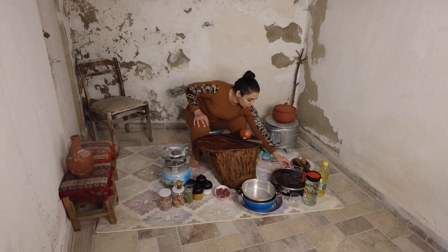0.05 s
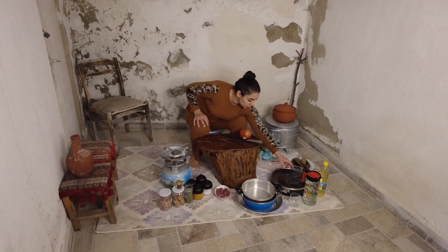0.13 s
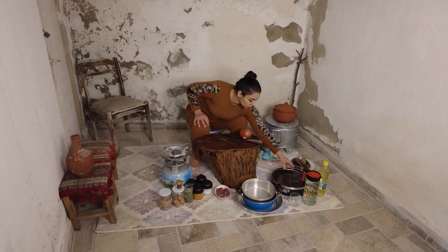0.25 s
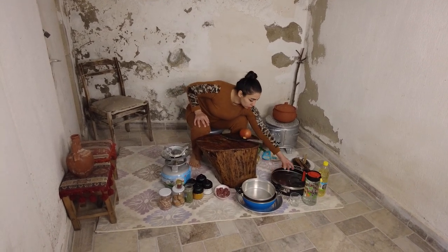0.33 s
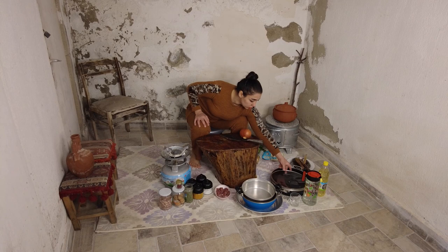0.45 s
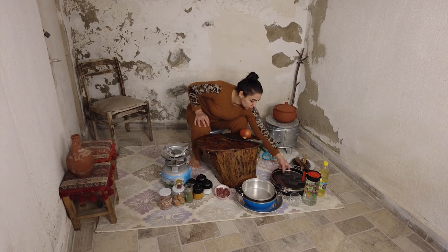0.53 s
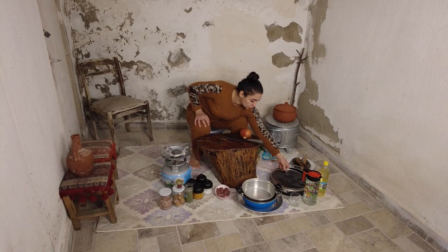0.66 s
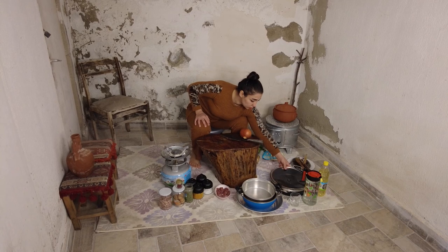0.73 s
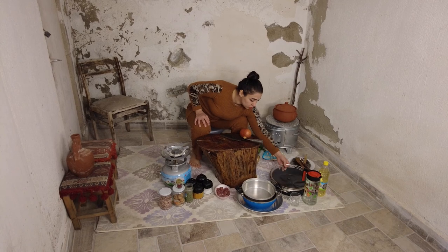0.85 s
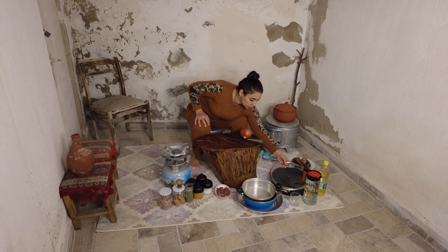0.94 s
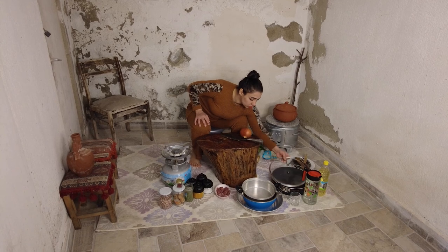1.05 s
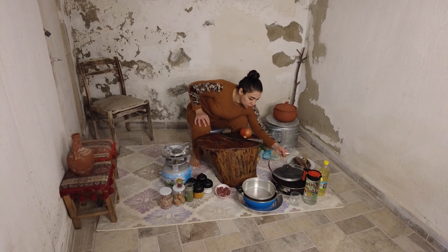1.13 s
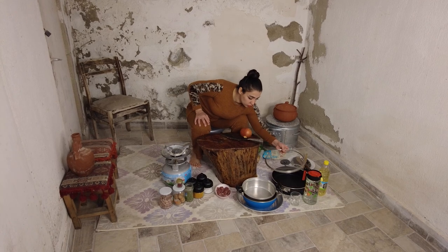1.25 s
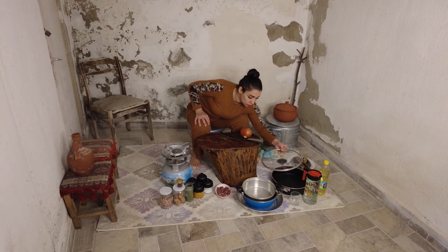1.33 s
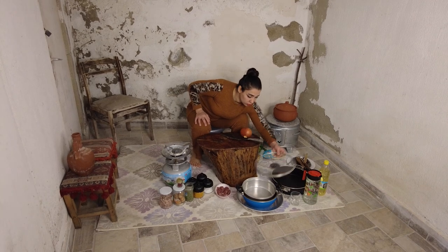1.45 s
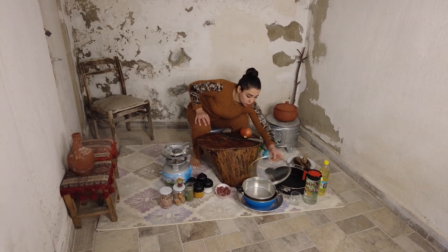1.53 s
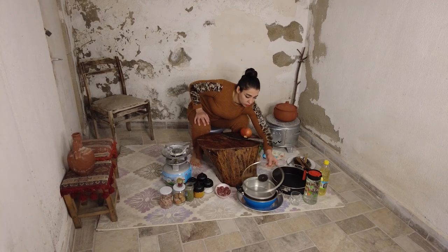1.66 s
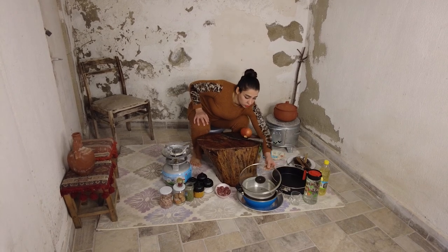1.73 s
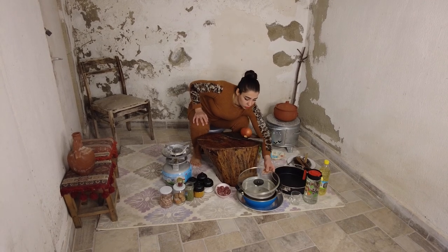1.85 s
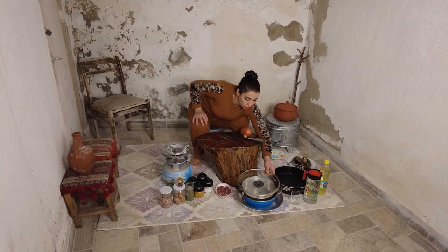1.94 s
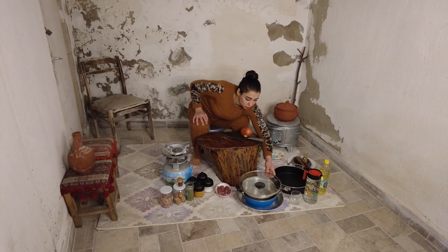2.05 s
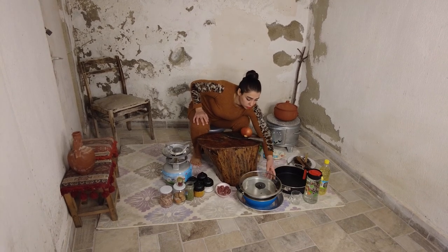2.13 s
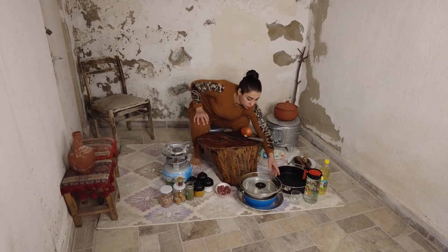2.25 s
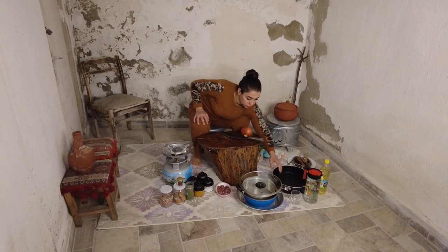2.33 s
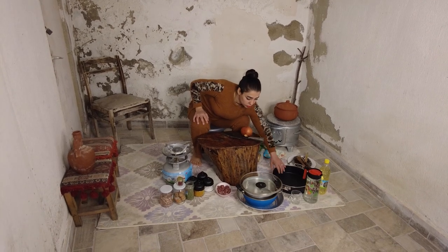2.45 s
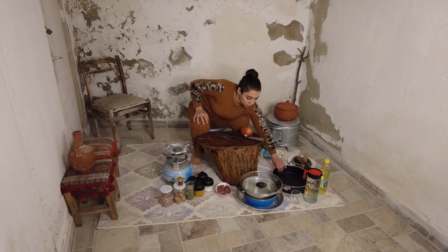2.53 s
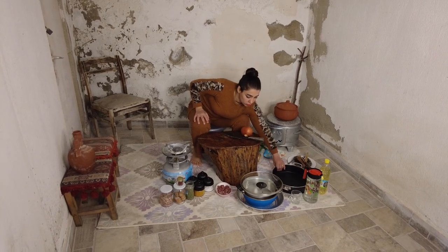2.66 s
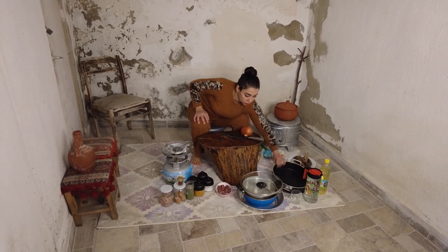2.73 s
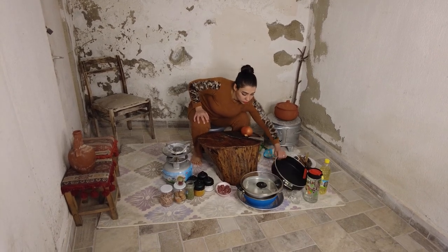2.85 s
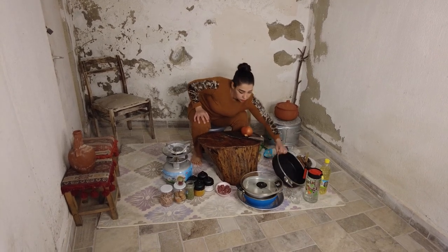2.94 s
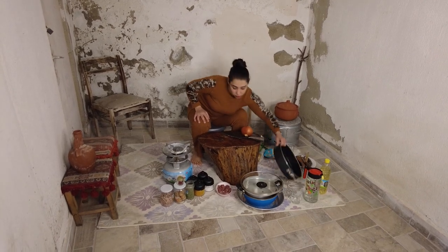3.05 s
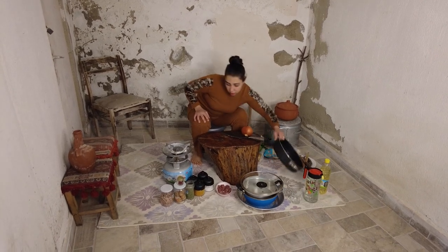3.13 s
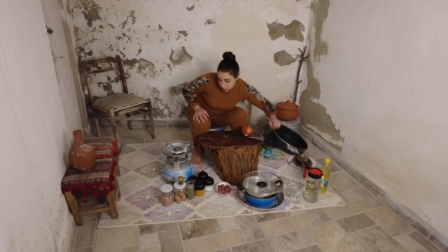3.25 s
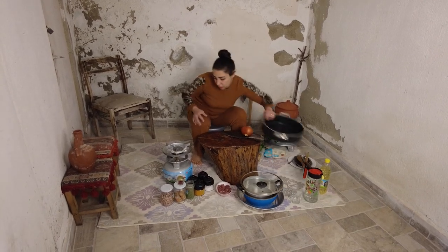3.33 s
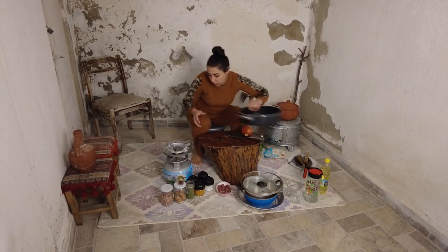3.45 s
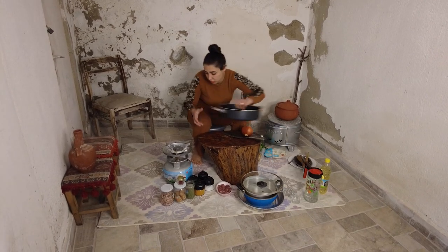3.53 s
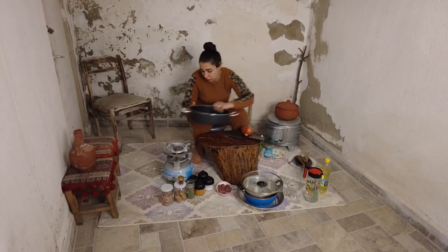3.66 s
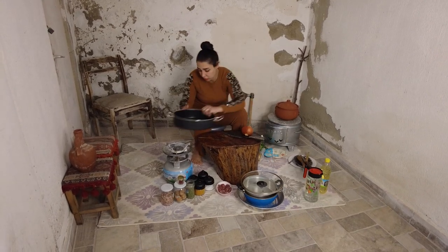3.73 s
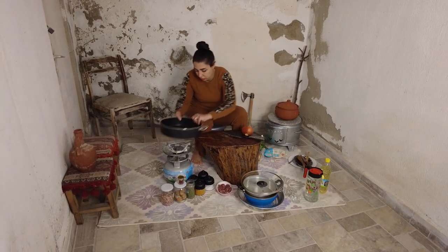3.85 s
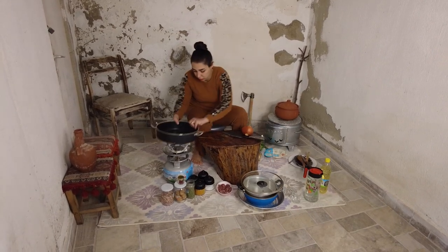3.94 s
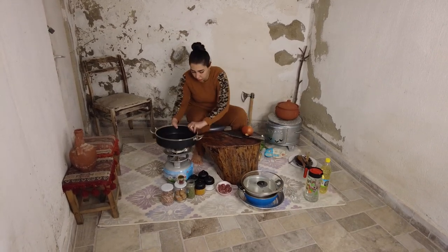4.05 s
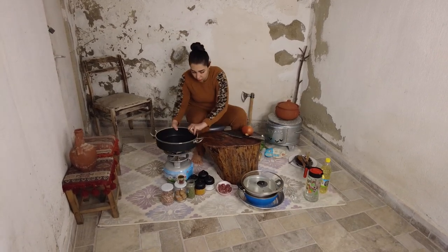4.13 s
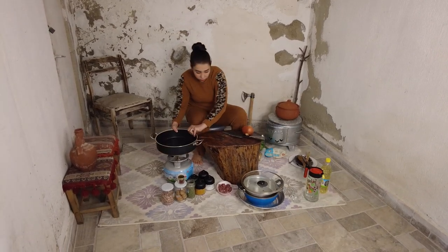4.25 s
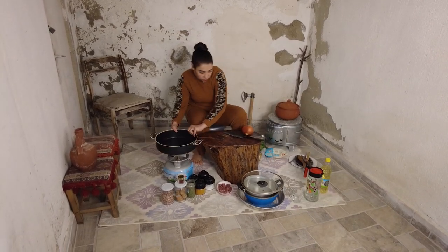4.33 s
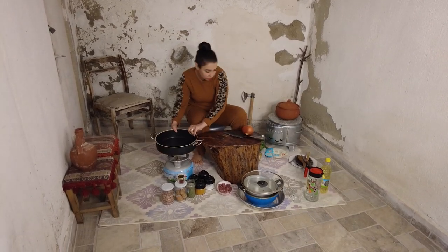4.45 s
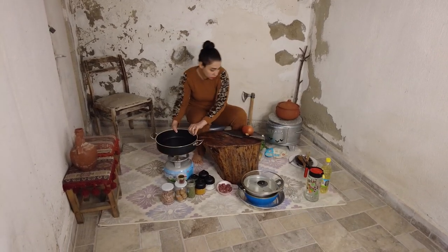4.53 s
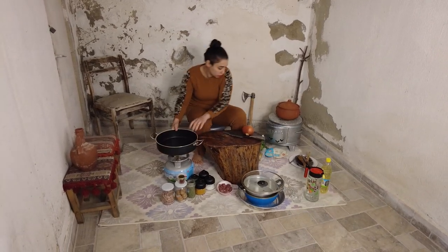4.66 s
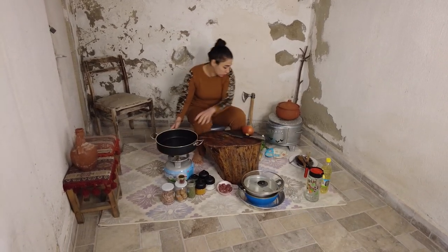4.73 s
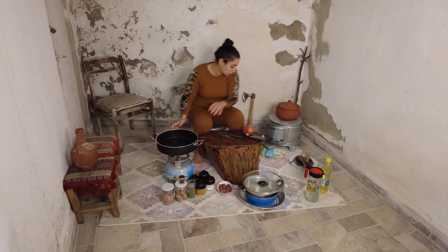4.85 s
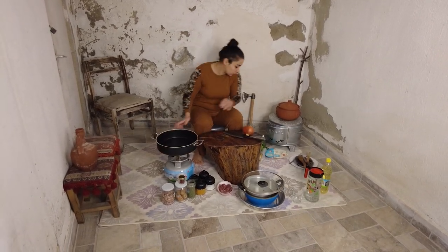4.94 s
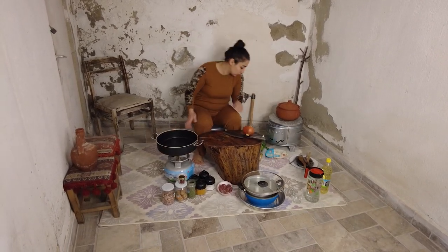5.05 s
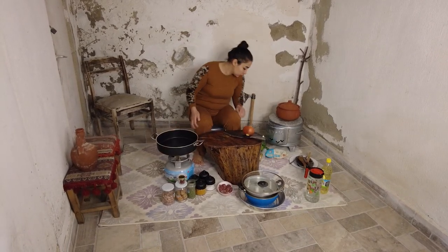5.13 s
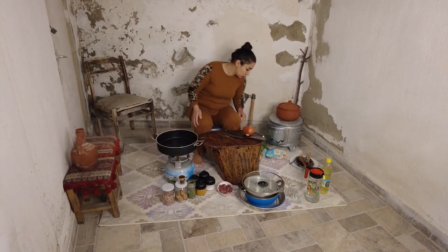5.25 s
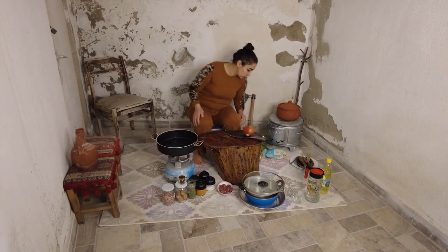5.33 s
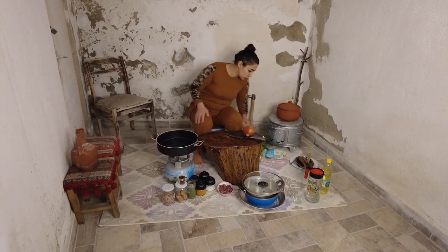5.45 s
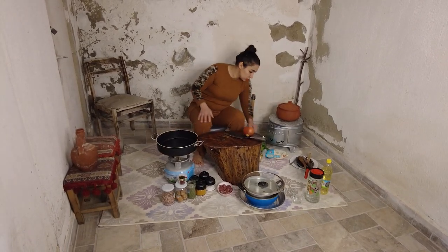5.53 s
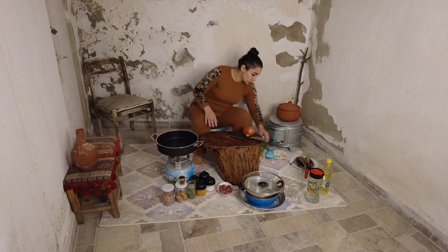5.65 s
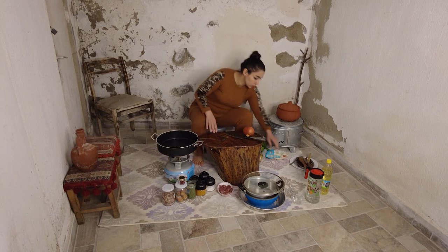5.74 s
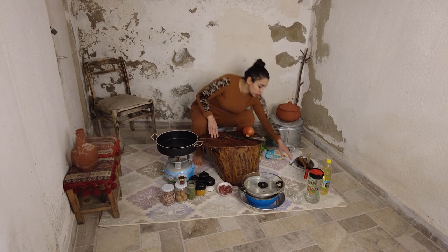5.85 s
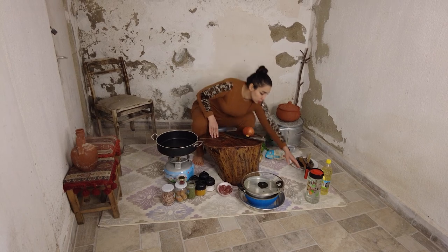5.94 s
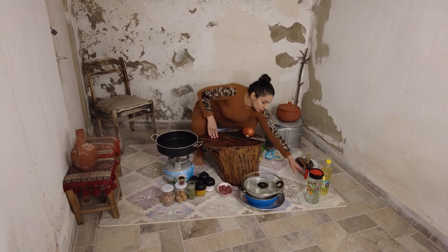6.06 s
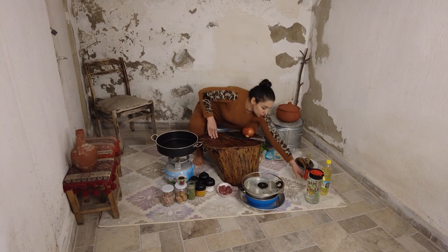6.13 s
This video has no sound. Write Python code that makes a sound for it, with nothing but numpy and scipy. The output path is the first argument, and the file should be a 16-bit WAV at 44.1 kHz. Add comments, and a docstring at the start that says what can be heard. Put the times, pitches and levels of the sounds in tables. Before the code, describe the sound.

Cookware knocks, rattles and is set down between hard walls, with a few bright bird chirps and a humming, rumbling street behind.

```python
"""Cookware in a bare room

A glass lid and a metal pan are moved about between hard walls: the lid knocks on the pan, comes off it and is
laid on a basin; the pan is tipped off the floor and set on a burner. Each contact is noise and a pulse driving
resonances and a diffuse echo. An opening lets in birds, gliding sines that start on the left, and a street of
filtered noise with an engine of harmonic orders speeding up. Steady tones and faint swells lie below.
"""
import sys
import numpy as np
from scipy import signal
from scipy.fft import rfft, irfft
from scipy.io import wavfile

SR = 44100
rng = np.random.default_rng(int(sys.argv[2]) if len(sys.argv) > 2 else 0)


def put_to_file(sound):
    """Save the sound as 16-bit audio at rate SR, in the file named by the first command-line argument."""
    columns = np.atleast_2d(sound).T  # one column per channel
    safe = np.clip(columns, -1, 1)
    whole_steps = np.round(safe * 32767)
    wavfile.write(sys.argv[1], SR, whole_steps.astype(np.int16))


N = 273420
TIME = np.arange(N) / SR


def from_db(db):
    """Logarithmic level: 20 dB is a factor of ten in amplitude."""
    return 10 ** (np.asarray(db) / 20)


def rms_one(x):
    """Power normalisation: scale to rms 1."""
    return x / np.sqrt(np.mean(x ** 2) + 1e-20)


def in_time(rows):
    """Linear interpolation: each column of a time curve, sample by sample."""
    s, *columns = np.transpose(rows)
    return [np.interp(TIME, s, column) for column in columns]


def at_hz(points, hz):
    """Spectral envelope: read a spectrum on a log-frequency axis."""
    point_hz, value = np.array(points)[:, :2].T
    return np.interp(np.log(hz), np.log(point_hz), value)


def drift(rate_hz):
    """Slow random modulation: low-passed noise of rms 1, computed at every 40th sample."""
    step = 40
    pole = np.exp(-2 * np.pi * rate_hz * step / SR)
    white = rng.standard_normal(N // step + 2002)
    slow = signal.lfilter([1], [1, -2 * pole, pole * pole], white)[2000:]   # skip the filter's start
    return np.interp(np.arange(N) / step, np.arange(len(slow)), rms_one(slow))


def resonance(x, hz, width_hz):
    """Damped resonator: a two-pole band-pass with gain 1 at its peak."""
    r = np.exp(-np.pi * width_hz / SR)
    zeros = np.array([1, 0, -1]) * (1 - r * r) / 2
    poles = [1, -2 * r * np.cos(2 * np.pi * hz / SR), r * r]
    return signal.lfilter(zeros, poles, x)


def narrow_noise(hz, width_hz):
    """Resonators in cascade: white noise passed twice through the same peak."""
    return resonance(resonance(rng.standard_normal(N), hz, width_hz), hz, width_hz)


def band(x, low_hz, high_hz):
    """Band limiting: a Butterworth band-pass."""
    return signal.sosfilt(signal.butter(2, [low_hz, high_hz], "band", fs=SR, output="sos"), x)


def stereo_bands(size, likeness):
    """Interaural coherence: half-octave noise bands, mid and side mixed for the asked left-right likeness."""
    edges = 22 * 2 ** np.arange(0, 9.6, .5)
    white = rng.standard_normal((2, 2, size))      # neighbouring bands get unrelated noise
    for k, (low, high) in enumerate(zip(edges, edges[1:])):
        mid, side = band(white[k % 2], low, high)
        hz = np.sqrt(low * high)
        alike = np.clip(at_hz(likeness, hz), -1, 1)
        yield hz, np.sqrt(1 + alike) * mid + np.sqrt(1 - alike) * side * [[1], [-1]]


def echo(x, t60s, likeness, build_ms):
    """Diffuse reverberation: noise that builds up, then decays by 60 dB in t60 in each band."""
    t, tail = TIME[:2 * SR], 0
    for hz, noise in stereo_bands(len(t), likeness):
        build_up = 1 - np.exp(-t * 1000 / build_ms)
        shape = build_up * from_db(-60 * t / at_hz(t60s, hz))
        tail = tail + noise * shape / np.sqrt(np.sum(shape ** 2))   # same energy scaling in every band
    return signal.fftconvolve(np.atleast_2d(x), tail, axes=1)[:, :N]


def clatter(contacts, body, modes, rise_ms, rub_ms, chatter_db):
    """Modal excitation: gritty rubs shake a crowd of small modes, sharp blows ring the clear ones."""
    chatter_ms, grit_db = 36.5, -0.5     # chatter decay; rub energy against the blow's
    boom_below_hz, tick_above_hz = 850, 6000
    boom, clang, tick = np.full((3, 2, N), 1e-18)      # two rows each: rub and blow
    t = TIME[:9000] * 1000
    decay = np.exp(-t / rub_ms) + from_db(chatter_db) * np.exp(-t / chatter_ms)
    pressure = (1 - np.exp(-t / rise_ms)) * decay
    for s, blow_db, boom_db, tick_db in contacts:
        rub = rng.standard_normal(len(t)) * pressure
        rub = from_db(grit_db) * rub / np.sqrt(np.sum(rub ** 2))
        blow = t == t[160]               # one-sample pulse, 3.6 ms into the rub
        both = np.array([rub, blow]) * from_db(blow_db)
        at = slice(round(s * SR), round(s * SR) + len(t))
        clang[:, at] += both
        boom[:, at] += both * from_db(boom_db)
        tick[:, at] += both * from_db(tick_db)
    freqs = np.maximum(np.fft.rfftfreq(N, 1 / SR), 1)
    low = 1 / (1 + (freqs / boom_below_hz) ** 4)
    high = 1 / (1 + (tick_above_hz / freqs) ** 4)
    shake = low * rfft(boom) + (1 - low - high) * rfft(clang) + high * rfft(tick)
    crowd, blows = irfft(shake * from_db(at_hz(body, freqs)), N)
    rings = sum(from_db(db) * resonance(blows, hz, width) for hz, width, db in modes)
    return crowd, rings


# Contacts of lid and pan: start_s, blow_db (relative), extra_boom_db, extra_tick_db
LID_ON_PAN_CONTACTS = [(.509, 39.5, 2, 4), (.541, 16.5, 14, 1.5), (.569, 24, 2.5, 6), (.621, 32, 0, 0.5),
                       (.649, -1, 20, -10), (.719, 2, -2, -11)]
# Broad colour of their many small modes: pitch_hz, level_db (per Hz)
LID_ON_PAN_COLOUR = [(90, -51.5), (150, -15.5), (240, -13.5), (350, -2.5), (560, -18.5), (1000, -25),
                     (1600, -18.5), (2500, -26.5), (4500, -30), (7500, -36.5), (11000, -48), (16000, -52)]
# Their clear modes: pitch_hz, width_hz, level_db (over the colour)
LID_ON_PAN_MODES = [(176, 8.4, -1), (315, 7.1, 5), (338, 39, -3), (385.5, 24, 6), (540, 36, 6.5),
                    (764, 120, 8), (1205, 36, 9.5), (1507, 9.5, 8), (1780, 16, 0), (2004, 21, 13.5),
                    (2473, 100, 12.5), (2920, 11, -17), (3860, 260, 5), (4250, 110, 3)]


def lid_on_pan():
    """Impact of two plates: the lid knocks on the pan and both ring."""
    return clatter(LID_ON_PAN_CONTACTS, LID_ON_PAN_COLOUR, LID_ON_PAN_MODES,
                   rise_ms=2.5, rub_ms=3.7, chatter_db=-27.5)


# Contacts as the lid comes off: start_s, blow_db (relative), extra_boom_db, extra_tick_db
LID_OFF_PAN_CONTACTS = [(1.037, 6.2, 1.5, 1.2), (1.064, 22.8, 1.7, 1.2), (1.075, 21.5, 0.73, 1.2),
                        (1.097, 9.2, 3.7, 3), (1.16, 1.7, 4.3, 1.5)]
# Broad colour of the small modes: pitch_hz, level_db (per Hz)
LID_OFF_PAN_COLOUR = [(150, -9), (250, -21), (390, 1), (600, -16.5), (900, -23.5), (1300, -21),
                      (2500, -24.5), (4500, -29), (7500, -42.5), (11000, -57), (16000, -54)]
# Clear modes: pitch_hz, width_hz, level_db (over the colour)
LID_OFF_PAN_MODES = [(338, 12, 1.2), (405, 51, 3.5), (687, 19, 9.8), (797, 44, 18.3), (1239.4, 17, 23.3),
                     (1440, 62, 12.4), (1828, 30, 12.2), (4400, 42, 2.7), (6040, 23, 17)]


def lid_off_pan():
    """Release of coupled plates: the lid comes off the pan with a few ringing touches."""
    return clatter(LID_OFF_PAN_CONTACTS, LID_OFF_PAN_COLOUR, LID_OFF_PAN_MODES,
                   rise_ms=2, rub_ms=3.9, chatter_db=-34.0)


# Contacts of lid and basin: start_s, blow_db (relative), extra_boom_db, extra_tick_db
LID_ON_BASIN_CONTACTS = [(1.778, 23.3, 0.5, 13.5), (1.793, 19.6, 7.5, 3), (1.814, 9.6, 15, 1.5),
                         (1.858, 17.3, 3.5, 5), (1.932, 23.5, 3, -.6), (2.016, 29.5, -4.5, 2.5),
                         (2.037, 10.8, 7.5, 1.5), (2.094, 10.8, 13, 8), (2.189, 8.5, 2, 10),
                         (2.298, 5.3, 0.5, 8.5)]
# Broad colour of the small modes: pitch_hz, level_db (per Hz)
LID_ON_BASIN_COLOUR = [(120, -34), (220, -23.5), (300, -9.5), (400, 0), (600, -7.5), (1000, -16.5),
                       (1600, -16.5), (3000, -18.5), (5000, -27), (7500, -33.5), (11000, -47.5),
                       (16000, -45)]
# Clear modes: pitch_hz, width_hz, level_db (over the colour)
LID_ON_BASIN_MODES = [(166, 17, 21.2), (290, 46, 6.2), (387, 9.4, 10.4), (428, 8.6, 1.6), (502, 96, 1.6),
                      (823, 58, 6.8), (1047, 72, 7.8), (1545, 130, 7.2), (2010, 20, 1.6), (2800, 340, 3.4),
                      (3310, 10, 1.8), (4220, 88, 1.4), (6100, 110, 4.8)]


def lid_on_basin():
    """Repeated impact: the lid is laid on the basin in a run of rubs and blows."""
    return clatter(LID_ON_BASIN_CONTACTS, LID_ON_BASIN_COLOUR, LID_ON_BASIN_MODES,
                   rise_ms=4.7, rub_ms=4.4, chatter_db=-12)


# Contacts of pan and floor: start_s, blow_db (relative), extra_boom_db, extra_tick_db
PAN_ON_FLOOR_CONTACTS = [(2.405, -6.5, 8, 9), (2.423, -0.5, -3.5, 11.5), (2.5, -7, 12, 10),
                         (2.631, -1.5, 8, 10), (2.691, 6, 4.5, -19), (2.765, -3, 15, 1),
                         (2.839, 16, -8, -2), (2.851, 16.5, -8.5, 0)]
# Broad colour of the small modes: pitch_hz, level_db (per Hz)
PAN_ON_FLOOR_COLOUR = [(150, -27), (250, -9.5), (350, 1.5), (700, -10), (1300, -6.5), (2300, -12.5),
                       (4200, -15.5), (7000, -24.5), (11000, -37.5), (16000, -32.5)]
# Clear modes: pitch_hz, width_hz, level_db (over the colour)
PAN_ON_FLOOR_MODES = [(352, 100, 2.9), (490, 24, 3.4), (1027, 41, 7.3), (1590, 150, 3.2), (1930, 31, 1.8),
                      (2900, 100, 1.4), (4120, 120, 4.2), (4480, 74, 4)]


def pan_on_floor():
    """Frictional contact: the pan is tipped off the floor with rubs and damped rings."""
    return clatter(PAN_ON_FLOOR_CONTACTS, PAN_ON_FLOOR_COLOUR, PAN_ON_FLOOR_MODES,
                   rise_ms=4.5, rub_ms=4.3, chatter_db=-20.5)


# Contacts of pan and burner: start_s, blow_db (relative), extra_boom_db, extra_tick_db
PAN_ON_BURNER_CONTACTS = [(4.343, 7.6, 1.5, 8), (4.357, 10.4, 1.5, 6), (4.389, 5.9, 3.3, -6),
                          (4.519, 13.4, 1.8, 11.5), (4.531, 10.8, 7.4, -7), (4.559, 4.9, 5.3, -14)]
# Broad colour of the small modes: pitch_hz, level_db (per Hz)
PAN_ON_BURNER_COLOUR = [(120, -21), (200, -11.5), (330, -0.5), (430, -4.5), (620, -2.5), (900, 1.5),
                        (1300, 1.5), (2200, -1), (3300, -2), (5000, -10.5), (7500, -19.5), (11000, -37),
                        (16000, -39)]
# Clear modes: pitch_hz, width_hz, level_db (over the colour)
PAN_ON_BURNER_MODES = [(169, 23, 16.2), (309, 19, 3.7), (357, 19, 8.7), (598, 17, 3.6), (634, 91, 10.3),
                       (680, 16, 2.9), (1217, 98, 7.4), (1380, 21, 4), (1726, 43, 8.6), (2120, 30, 2.3),
                       (2400, 120, 5.8), (2980, 110, 8.7), (3300, 30, 5.8)]


def pan_on_burner():
    """Impact on a support: the pan is set on the burner in two short groups of touches."""
    return clatter(PAN_ON_BURNER_CONTACTS, PAN_ON_BURNER_COLOUR, PAN_ON_BURNER_MODES,
                   rise_ms=3.2, rub_ms=5.4, chatter_db=-20.0)


# Faint treble rustles, some as the pan drags on the floor: start_s, swell_ms,
# level_db (before band limit and room)
RUSTLE_PUFFS = [(2.13, 33, -67.5), (2.431, 47, -64), (2.66, 60, -65.5), (3.2, 16, -63.5), (5.214, 19, -68)]


def rustles():
    """Amplitude-modulated noise: soft puffs of treble that rise and die away."""
    puffs = 0
    for s, swell_ms, db in RUSTLE_PUFFS:
        age = np.clip(TIME - s, 0, None) * 1000 / swell_ms
        puffs = puffs + from_db(db) * age * np.exp(1 - age)     # peaks when age is 1
    return band(puffs * rng.standard_normal(N), 2300, 18000)


# Decay of the room: pitch_hz, t60_s
ROOM_DECAY = [(150, 1), (400, 0.67), (1200, 0.48), (3500, 0.36), (8000, 0.27), (15000, 0.22)]
# Left-right likeness of the room echo: pitch_hz, correlation (-1 to 1)
ROOM_COHERENCE = [(100, 0.95), (250, 0.98), (550, 0.072), (1650, 0.47), (5000, -0.073), (15000, -0.03)]


def cookware():
    """Direct and reverberant field: contacts and rustles, heard mostly through the echo of the bare walls."""
    contacts = [lid_on_pan(), lid_off_pan(), lid_on_basin(), pan_on_floor(), pan_on_burner()]
    crowd, rings = np.sum(contacts, axis=0)
    crowd = crowd + rustles()
    walls = echo(crowd + from_db(-1) * rings, ROOM_DECAY, ROOM_COHERENCE, build_ms=2.4)
    direct = from_db(-5.0) * crowd + from_db(-9.0) * rings
    return (direct + walls) * from_db([[.4], [-.4]])     # slightly to the left


def far_notes():
    """Random superposition: faint notes of distant birds at chance moments and pitches."""
    low_hz, high_hz, trill_hz = 3040, 6940, 60
    mean_db, spread_db, mean_length_s = -82, 9, 0.034
    when, pitch, slide, size, loud = rng.random((36, 5)).T
    start_s = when * TIME[-1]
    length_s = mean_length_s * (.5 + size)
    first_hz = low_hz * (high_hz / low_hz) ** pitch
    last_hz = first_hz * (1 + 0.112 * (slide - .5))
    level_db = mean_db + spread_db * (2 * loud - 1)
    return list(zip(start_s, length_s, first_hz, last_hz, np.full(36, trill_hz), level_db))


# Bird notes that stand out: start_s, length_s, first_hz, last_hz, trill_depth_hz,
# level_db (direct sound, before flicker and side)
BIRD_NOTES = [(0.083, 0.064, 4580, 4780, 13, -72), (.249, 0.38, 3370, 3310, 37, -74),
              (0.371, 0.023, 6680, 6900, 30, -65.5), (0.382, 0.046, 7470, 7550, 110, -67),
              (.45, .094, 5650, 5930, 32, -68), (0.933, 0.039, 6200, 6850, 8.4, -75),
              (0.952, .05, 2963, 2920, 28, -67), (1.038, 0.052, 2920, 2900, 38, -68),
              (1.14, 0.02, 7000, 8070, 12, -70), (1.279, 0.21, 3780, 3730, 120, -76),
              (1.447, 0.045, 5250, 4900, 60, -76), (1.48, 0.13, 2670, 2800, 150, -73),
              (1.591, .2, 3250, 3300, 99, -75.5), (2.736, 0.039, 8360, 8300, 44, -67),
              (2.893, 0.057, 8400, 7920, 24, -60.5), (2.944, 0.036, 7800, 7750, 30, -69),
              (3.022, 0.12, 6160, 5990, 246, -49.5), (3.196, 0.13, 3980, 4120, 204, -48),
              (3.351, 0.098, 5160, 5820, 27, -47.5), (3.499, 0.07, 4116, 4176, 15, -40.5),
              (3.61, .09, 4720, 4520, 43, -62.5), (3.912, .077, 2790, 2750, 21, -70),
              (4.792, 0.033, 4600, 4590, 11, -63.5), (5.032, 0.033, 5050, 4850, 30, -64.5),
              (5.392, .015, 5160, 5180, 21, -61), (5.42, 0.049, 6430, 6330, 40, -73),
              (5.474, .04, 6300, 5800, 55, -70), (5.519, 0.041, 5770, 4920, 56, -64.5),
              (5.627, .035, 4740, 4700, 110, -65), (5.758, 0.021, 4720, 4620, 60, -63),
              (5.97, .045, 5540, 5230, 72, -67), (5.989, 0.064, 3410, 3990, 90, -66.5),
              (6.074, 0.043, 5850, 5900, 30, -74), (6.144, 0.036, 4700, 4470, 47, -70)]
# Side the singing comes from: time_s, left_over_right_db
BIRD_DIRECTION = [(0, 13), (1.5, 28.5), (2.8, 13.5), (3.6, 9.5), (5.4, 0), (6.2, -19)]


def birds():
    """Frequency modulation: gliding, trilled whistles with long echoes; deep trills swell in slowly."""
    trill_rate_hz, trill_wander_hz, trill_rough = 187, 6, .18
    glide_s, release_s, overtone_db = .02, 0.0054, -37
    attack_s, trill_swell_s_per_hz = 0.0034, 0.00014
    out = np.zeros(N)
    flicker = from_db(1.26 * drift(23))
    trill_turn = 2 * np.pi * np.cumsum(trill_rate_hz + trill_wander_hz * drift(12)) / SR
    warble = np.sin(trill_turn) + trill_rough * drift(130)
    for s, length, first_hz, last_hz, trill_hz, db in BIRD_NOTES + far_notes():
        start = round(s * SR)
        t = TIME[:min(round(length * SR), N - start)]
        at = slice(start, start + len(t))
        glide_hz = last_hz + (first_hz - last_hz) * np.exp(-t / glide_s)
        turn = 2 * np.pi * np.cumsum(glide_hz + trill_hz * warble[at]) / SR
        attack = np.minimum(1, t / (attack_s + trill_swell_s_per_hz * trill_hz))
        shape = attack * np.minimum(1, (length - t) / release_s)
        tone = np.sqrt(2) * (np.sin(turn) + from_db(overtone_db) * np.sin(2 * turn))
        out[at] += tone * shape * flicker[at] * from_db(db)
    side_db, = in_time(BIRD_DIRECTION)
    out = out * from_db([[.5], [-.5]] * side_db)
    likeness = [(2000, 0.13), (9000, .1)]
    yard = echo(out, [(2000, 0.73), (9000, 0.72)], likeness, build_ms=2.5)
    far_walls = echo(out, [(2000, 2.7), (9000, 2.1)], likeness, build_ms=81.0)
    return out + from_db(-2.5) * yard + from_db(-14) * far_walls


# Firing rate as the engine climbs through a gear: time_s, firing_hz
ENGINE_FIRING = [(2.1, 46), (2.45, 50.5), (3.55, 88.7), (4.6, 122), (5.7, 140)]
# Harmonic orders of the firing rate: multiple, level_db (added to the path's)
ENGINE_HARMONICS = [(1, -2.5), (2, -8), (3, -15)]
# Street and room favour some pitches: pitch_hz, level_db (rms of a 0 dB order passing there)
ENGINE_PATH_RESPONSE = [(44, -58), (50, -31.5), (68, -46), (82, -51.5), (100, -35), (111, -46), (121, -38),
                        (132, -61), (172, -38), (200, -49.5), (224, -46), (250, -48.5), (300, -62)]


def engine():
    """Harmonic orders: sines at multiples of the firing rate, each loud where the path favours its pitch."""
    in_s, out_s, fade_s = 1.8, 5.77, 0.54
    firing_hz, = in_time(ENGINE_FIRING)
    turn = 2 * np.pi * np.cumsum(firing_hz + 0.8 * drift(9.2)) / SR
    fade = np.clip(np.minimum(TIME - in_s, out_s - TIME) / fade_s, 0, 1)
    orders = 0
    for k, db in ENGINE_HARMONICS:
        path_db = at_hz(ENGINE_PATH_RESPONSE, k * firing_hz)
        orders = orders + from_db(db + path_db) * np.sin(k * turn)
    return fade * np.sqrt(2) * orders


# Steady tones, mains hum the lowest: pitch_hz, level_db (rms, about which it wavers)
HUM_TONES = [(100, -47.5), (1222, -68.5)]


def hum():
    """Line spectrum: steady sines that waver a little in pitch and level."""
    out = 0
    for hz, db in HUM_TONES:
        gain = from_db(db + 3.5 * drift(2.6))
        turn = 2 * np.pi * hz * np.cumsum(1 + 0.0028 * drift(7.2)) / SR
        out = out + np.sqrt(2) * gain * np.sin(turn)
    return out


# Resonances that gather the low drone: pitch_hz, width_hz (each of two passes), level_db (relative)
DRONE_RESONANCES = [(39.9, 11.7, 4.5), (48.07, 9.4, 11), (58.4, 10.3, -2), (122, 4.7, -19.5)]


def drone():
    """Resonant filtering: noise gathered in a few low peaks, scaled to rms 1."""
    return rms_one(sum(from_db(db) * narrow_noise(hz, width) for hz, width, db in DRONE_RESONANCES))


# Spectrum of tyre and air wash: pitch_hz, level_db (relative, per Hz)
WASH_SPECTRUM = [(24, -33), (36, -7), (55, 2), (78, -15), (110, -12.5), (200, -18), (300, -25),
                 (450, -21.5), (800, -32), (1300, -33), (2400, -42), (5200, -46.5), (7000, -55.5),
                 (9500, -60), (16000, -76)]
# Left-right likeness of the wash: pitch_hz, correlation (-1 to 1)
WASH_COHERENCE = [(60, 0.98), (130, 0.93), (290, 0.83), (640, 0.028), (1410, 0.45), (3100, -0.025),
                  (6820, -0.36), (15000, -0.32)]


def wash():
    """Partly coherent noise: broad bands that waver partly together, scaled to rms 1."""
    together = drift(3.2)
    out = 0
    for hz, noise in stereo_bands(N, WASH_COHERENCE):
        waver_db = 1.45 * (.7 * together + drift(3.3))
        out = out + noise * from_db(at_hz(WASH_SPECTRUM, hz) + waver_db)
    return rms_one(out)


# Street levels: time_s, drone_db (before a slight lean to the right), wash_db
STREET_LEVELS = [(0, -51, -38), (.7, -34, -36), (1.4, -36, -41.5), (2.4, -37, -37), (2.9, -49, -40.5),
                 (3.5, -45.5, -40), (4.2, -47.5, -39), (5.0, -36.5, -41), (5.6, -48.5, -41),
                 (6.2, -40.5, -41)]


def street():
    """Superposition of sources: a low drone, an engine and hum, under a broad wash."""
    drone_db, wash_db = in_time(STREET_LEVELS)
    low = (from_db(drone_db) * drone() + engine() + hum()) * from_db([[-.8], [.8]])
    return low + from_db(wash_db) * wash()


# Low tones that swell: start_s, length_s, pitch_hz, width_hz (each of two passes),
# level_db (rms of the noise before its swell)
SWELLING_TONES = [(0.115, 0.44, 437, 24.7, -51), (1.254, 0.45, 405, 24.7, -53.5),
                  (4.878, 0.5, 544, 30, -58.5)]


def moans():
    """Narrow-band noise: low, unsteady tones that swell and fade along a half sine."""
    out = 0
    for s, length, hz, width, db in SWELLING_TONES:
        swell = np.sin(np.pi * np.clip((TIME - s) / length, 0, 1))
        out = out + from_db(db) * swell * rms_one(narrow_noise(hz, width))
    return out


def scene():
    """Linear superposition: cookware, birds, street and moans add up."""
    return cookware() + birds() + street() + moans()


def record(dry):
    """Self-noise and band limit: the microphone adds its own hiss; the top is cut steeply."""
    hiss = signal.lfilter([1], [1, -.3], rng.standard_normal(dry.shape))
    hissy = dry + from_db(-71.5) * hiss
    steep_cut = signal.cheby2(14, 70, 16500, fs=SR, output="sos")     # 70 dB down from 16.5 kHz
    return signal.sosfilt(steep_cut, hissy)


dry = scene()
out = record(dry)
put_to_file(out)
```